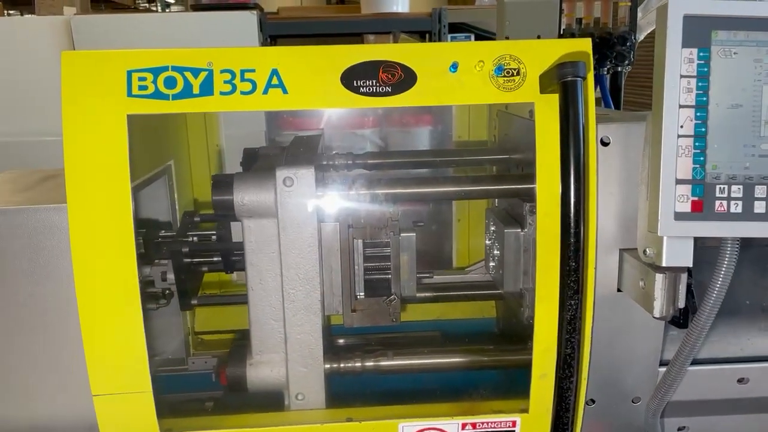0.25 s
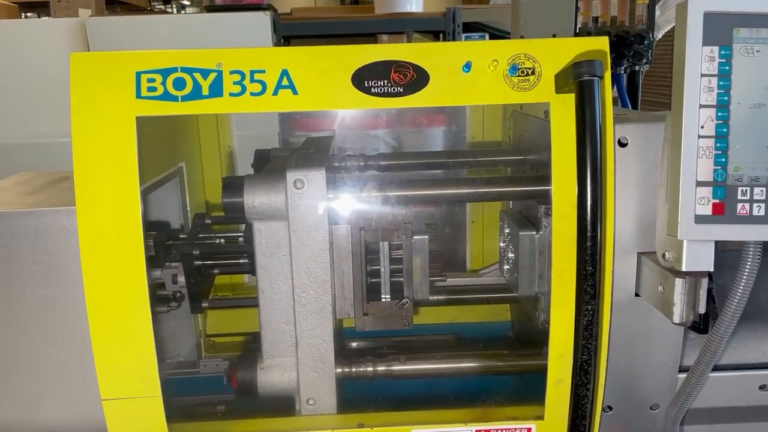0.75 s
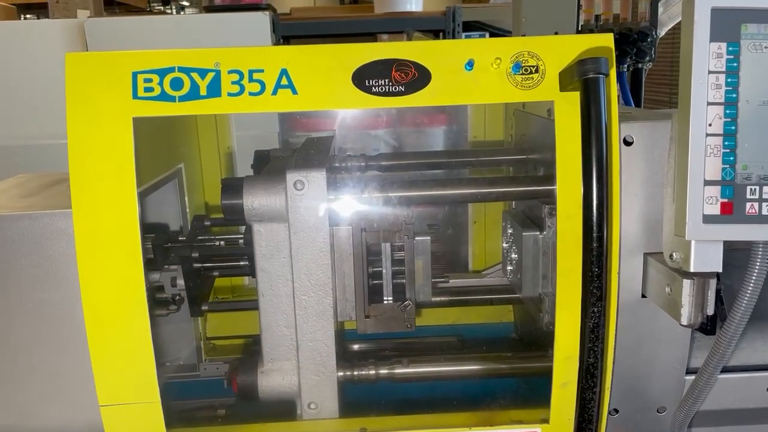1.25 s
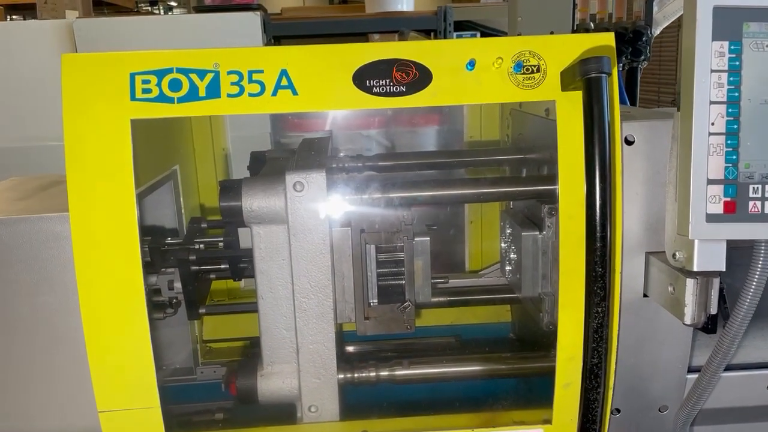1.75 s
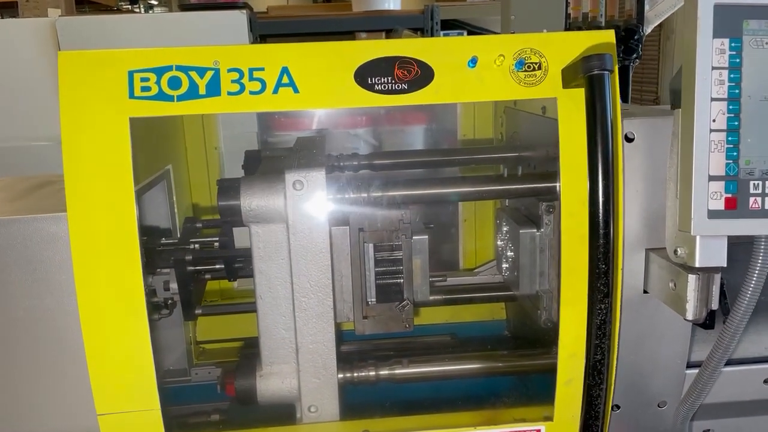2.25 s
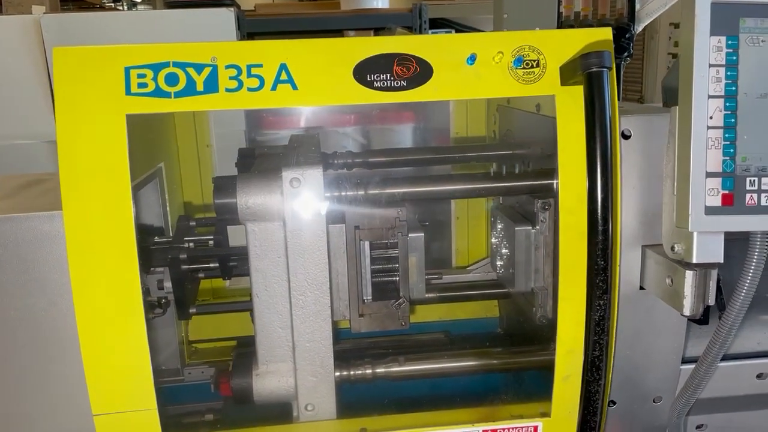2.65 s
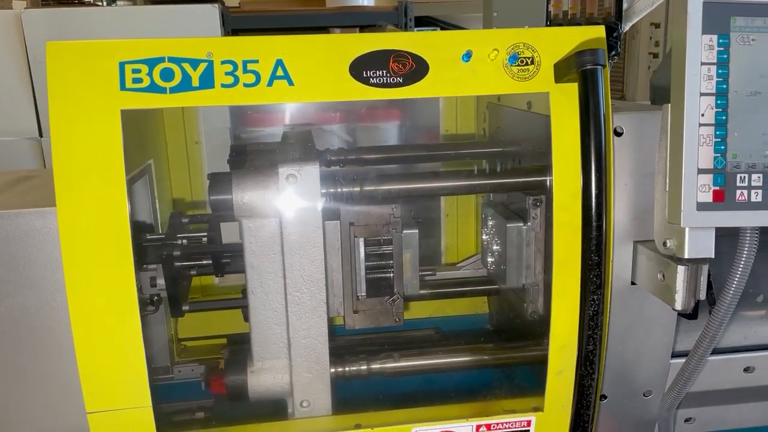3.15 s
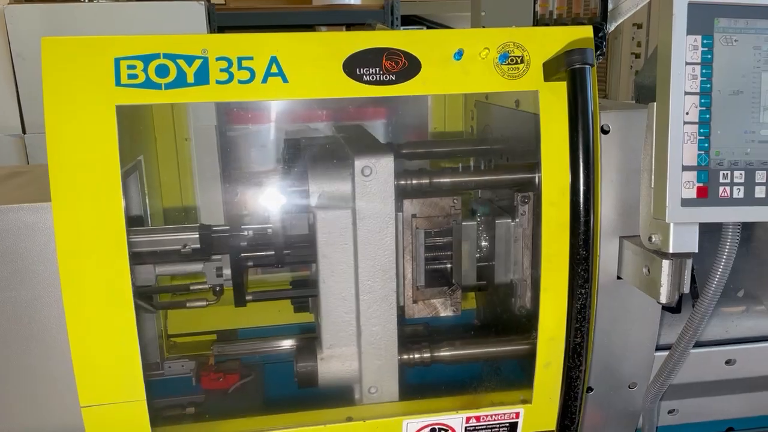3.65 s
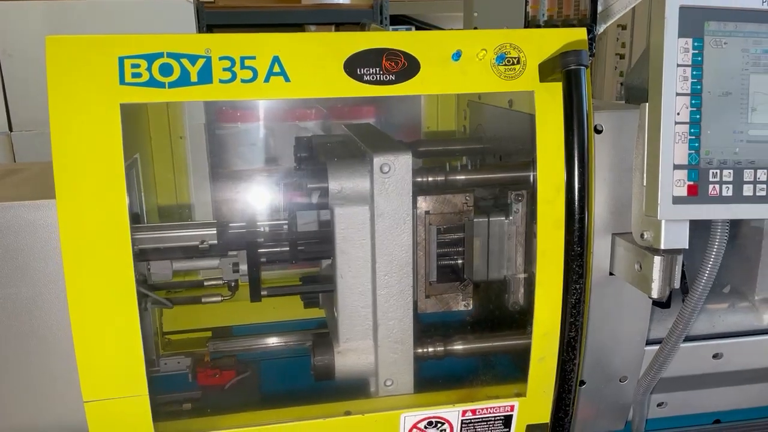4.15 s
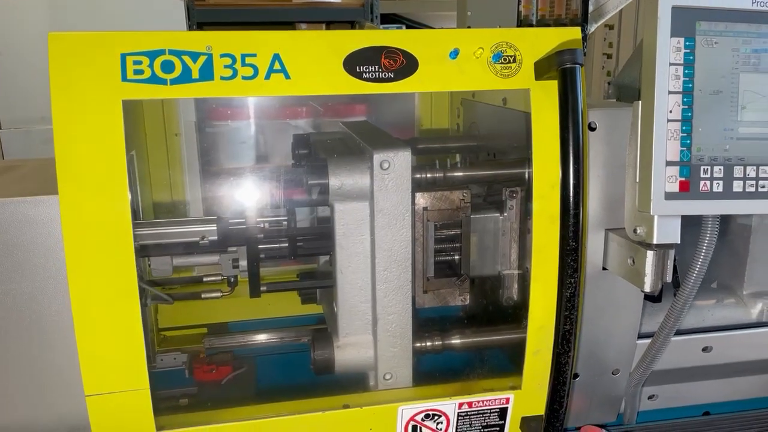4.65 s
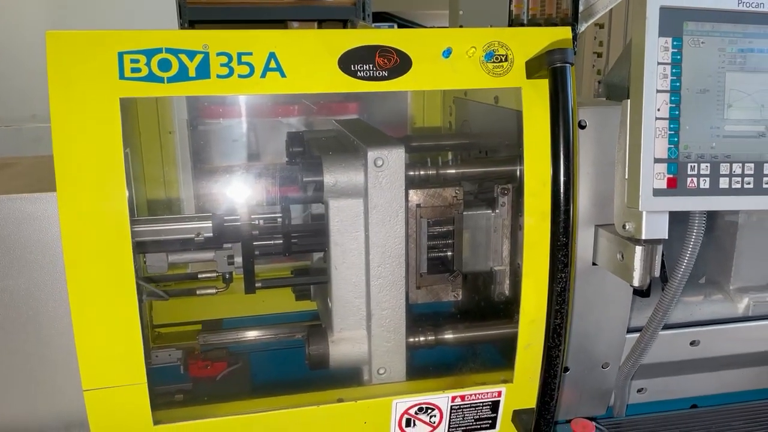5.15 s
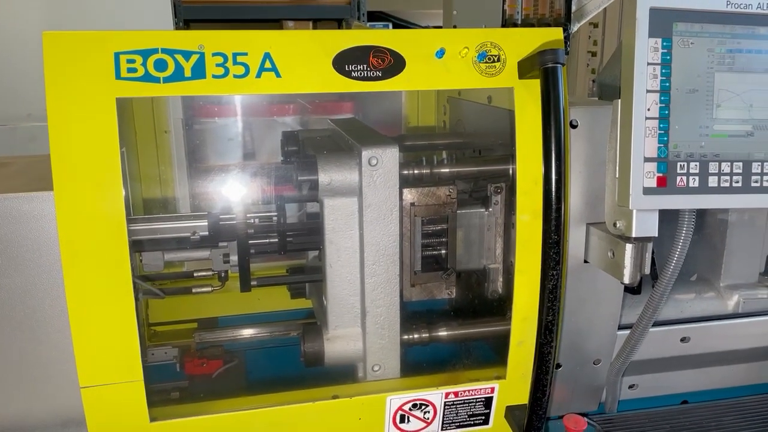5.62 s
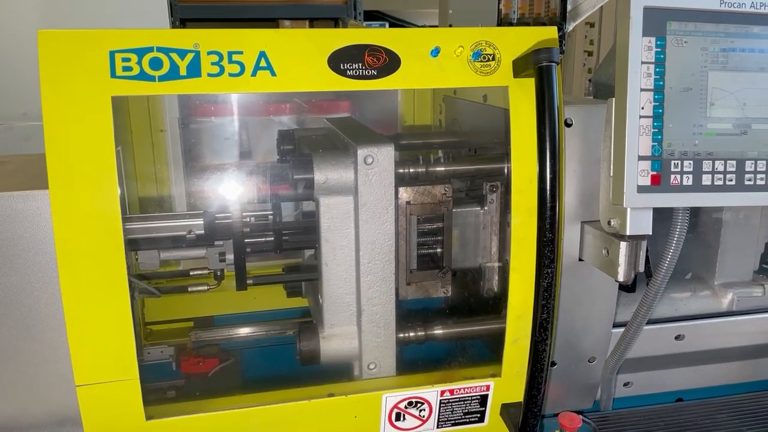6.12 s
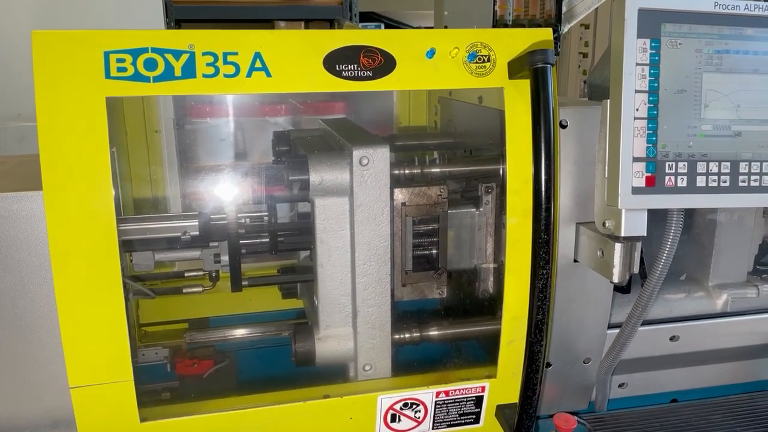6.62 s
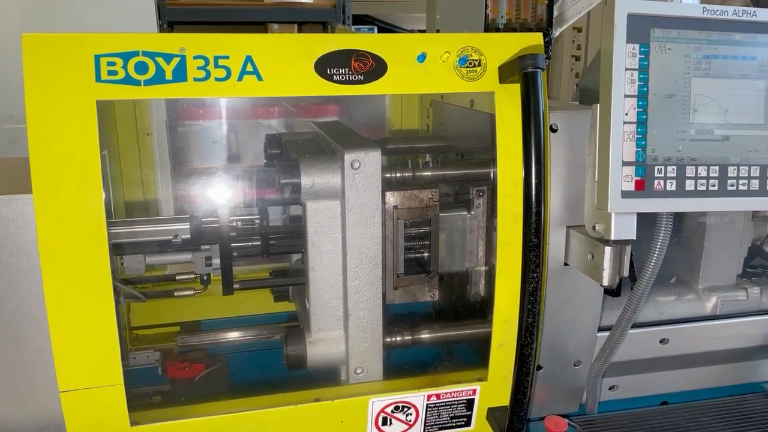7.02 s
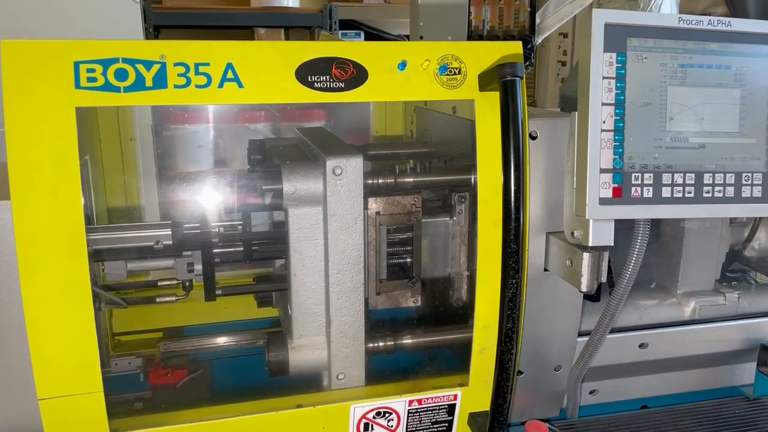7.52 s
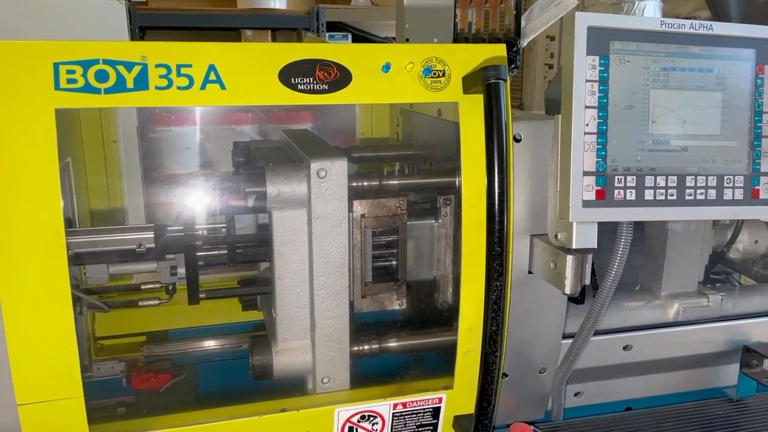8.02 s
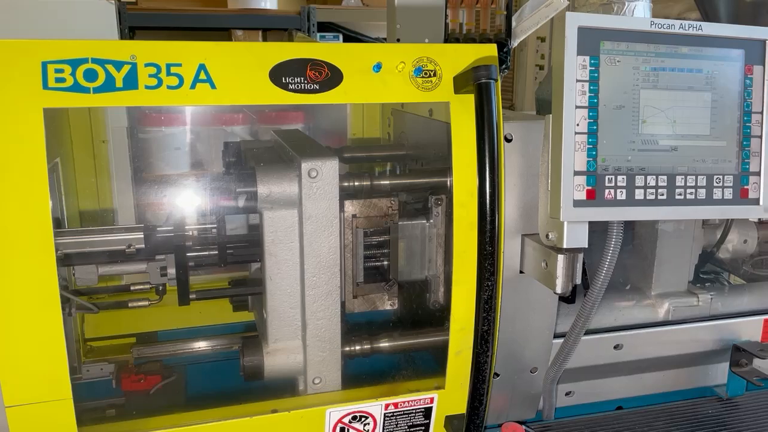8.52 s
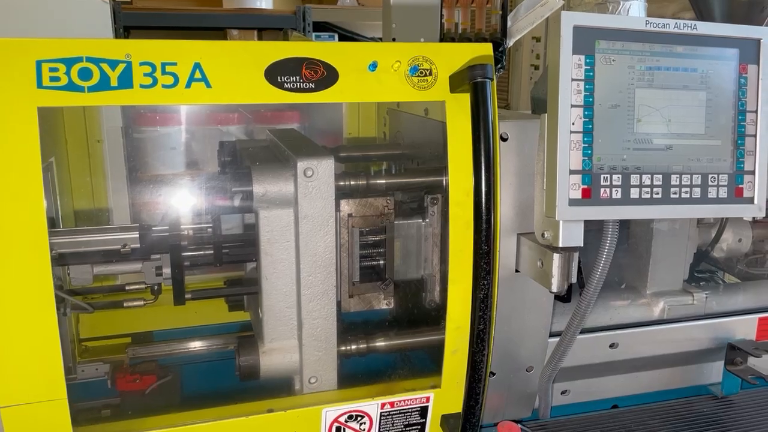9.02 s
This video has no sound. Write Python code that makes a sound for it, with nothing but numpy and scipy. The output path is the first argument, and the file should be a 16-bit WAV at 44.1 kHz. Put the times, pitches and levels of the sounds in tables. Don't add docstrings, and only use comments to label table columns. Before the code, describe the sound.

A hydraulic moulding machine runs in a workshop, heard close up in stereo, with low fan rumble, faint distant motors and a constant pump whine near 270 Hz and its multiples, strongest around 540. At 0.33 s oil spurts and whistles; dull knocks and a very sharp crack at 0.48 begin a plastic part's clatter down a chute, fading by 1.3. Valve clacks and knocks come at 1.32-1.4, then steady whine. At 2.94-3.0 valves snap, oil hisses and the pump surges and dips as the platen slides shut, easing by 3.85 after a soft puff. From 4.34 to 4.95 come hissing bursts, short whistles and clunks, sharpest near 4.7. A light valve tick at 5.1 and another at 5.49 lead into clamping: hiss and a loud, slightly lower hum from 5.9 to 6.9. A click at 6.88 releases it into steady idle whine and thin high hiss until about 9.2.

```python
import sys
import numpy as np
from scipy import signal
from scipy.fft import rfft, irfft
from scipy.io import wavfile
from scipy.ndimage import uniform_filter1d

SR = 44100
rng = np.random.default_rng(int(sys.argv[2]) if len(sys.argv) > 2 else 0)


def level_to_linear(level):
    exponent = np.asarray(level, float) / 20
    return 10 ** exponent


def wrap_up_sound(samples):
    columns = np.atleast_2d(samples).T
    tamed = np.clip(columns, -1, 1)
    steps = np.round(tamed * 32767).astype(np.int16)
    wavfile.write(sys.argv[1], SR, steps)


N = 408807
TIME_S = np.arange(N) / SR
BINS_HZ = np.fft.rfftfreq(N, 1 / SR)[1:]
BLOW_S = np.arange(SR // 2) / SR
CONTROL_STEP = 40

# freq_hz, density_db
HALL_SPECTRUM = [(150, 11.5), (300, -4), (450, -7), (700, -3), (1200, -6.5), (1500, -13.5), (2500, -15.5),
                 (3500, -29.5), (5000, -35), (7000, -28.5), (9000, -17.5), (11000, -42), (12500, -45),
                 (14500, -62.4)]
# freq_hz, density_db
RUMBLE_SPECTRUM = [(12, -49), (20, -67), (46, -5), (64, 3.5), (97, -6.5), (135, -6.5), (189, -27.5),
                   (220, -12), (290, -3.5), (480, -120)]
HALL_DB, RUMBLE_DB = -39, -31
# pitch_hz, level_db
MOTORS = [(360, -56.5), (716, -59), (915, -52), (1157, -58.5), (1206, -60), (1970, -62), (7065, -75)]

# time_s, rate_hz
PISTON_RATE = [(0, 269.1), (2.99, 269.3), (3.1, 266.5), (3.22, 264.0), (3.32, 265.7), (3.43, 267.5),
               (3.53, 269.2), (4.3, 269.15), (4.45, 266.3), (4.62, 268.6), (4.88, 267.2), (5.1, 269.2),
               (5.67, 269.0), (5.79, 267.3), (6.08, 266.2), (6.86, 266.3), (6.98, 269.3), (9.27, 269.3)]
IDLE_HZ, FULL_SLIP_HZ = 269.3, 3.1
CLAMP_HELD_S, CLAMP_RAMP_S = 5.45, 0.15
# multiple, open_idle_db, open_loaded_db, clamped_idle_db, clamped_loaded_db
ORDERS = [(2, -43, -29.5, -40.5, -27), (3, -51, -39, -52, -41), (4, -57, -51, -54, -38.5),
          (5, -70, -57, -60, -61), (6, -63, -56, -56, -55), (7, -70, -60, -68, -51),
          (8, -63, -56, -61, -64), (9, -61, -61, -55, -53), (10, -74, -61, -55.5, -52.5),
          (11, -73, -68, -68, -56), (12, -75, -64, -64, -66), (13, -71, -70, -66, -69),
          (14, -66, -67, -63, -61), (15, -78, -66, -76, -64), (17, -78, -70, -72, -74),
          (18, -78, -70, -78, -63), (20, -78, -64, -68, -63), (22, -72, -61, -74, -68),
          (24, -81, -69, -76, -68), (32, -90, -78, -89, -84), (35, -78, -66, -80, -69),
          (39, -75, -62, -80, -65), (42, -74, -60, -70, -60), (44, -78, -63, -80, -66)]
# time_s, gain_db
LINE_PRESSURE = [(.1, 1), (.3, 2.5), (1.24, -1), (1.6, 2.5), (3.0, -4), (3.17, 0), (3.26, -0.5), (3.34, 0),
                 (3.57, 5), (3.78, 6), (4.2, -1), (4.5, 1), (4.92, -3), (5.1, -1), (6.1, -1), (7.25, 0),
                 (9.1, 0), (9.22, -14)]
# start_s, stop_s, level_db
BASE_BOOM = [
    (.02, .14, -48),
    (3.05, 3.3, -44),
    (3.33, 3.5, -38),
    (3.6, 4.3, -56),
    (4.42, 4.76, -35),
    (4.85, 4.96, -46),
    (5.62, 5.82, -41),
    (5.82, 6.95, -34.5),
    (6.95, 9.4, -43.5),
]
# start_s, stop_s, level_db
TANK_HUM = [(-.05, .14, -42), (.3, .62, -47), (.62, 1.1, -42), (1.1, 1.5, -44), (1.5, 2.85, -40.5),
            (2.85, 3.0, -47), (3.0, 3.05, -36), (3.05, 3.12, -31), (3.13, 3.21, -25), (3.21, 3.32, -30.5),
            (3.32, 3.39, -26.5), (3.39, 3.47, -29.5), (3.55, 4.05, -40), (4.05, 4.35, -48),
            (4.35, 4.41, -35), (4.41, 4.49, -28.5), (4.53, 4.58, -30), (4.58, 4.65, -39), (4.66, 4.82, -45),
            (4.825, 4.94, -31), (4.94, 5.0, -40), (5.0, 5.2, -46), (5.2, 5.47, -41), (5.47, 5.64, -46),
            (5.64, 5.75, -39), (5.75, 5.8, -33), (5.8, 5.9, -30), (5.9, 5.97, -27.5), (5.97, 6.5, -24),
            (6.5, 6.9, -26), (6.9, 6.95, -31), (7.02, 7.8, -35.5), (7.8, 9.15, -39)]
# start_s, stop_s, level_db
PIPE_6 = [
    (1.5, 3, -59.5),
    (3.048, 3.4, -52),
    (3.545, 3.853, -54),
    (5.785, 6.06, -51),
    (6.2, 6.8, -58),
    (6.95, 8.398, -52),
    (8.4, 9.2, -56),
]
PIPE_7 = [
    (3.05, 3.4, -65),
    (3.6, 3.85, -57),
    (5.95, 6.25, -51.5),
    (6.25, 6.45, -58),
    (6.45, 6.66, -48.5),
    (6.95, 9.2, -60),
]
PIPE_9 = [
    (1.9, 3.4, -63),
    (6.1, 6.4, -58),
    (6.4, 6.92, -52),
    (6.95, 7.65, -67),
    (7.65, 8.75, -54.5),
    (8.75, 9.2, -59),
]
PIPE_10 = [
    (3.0, 3.45, -63),
    (5.904, 6.95, -55),
    (7.55, 8.35, -55),
    (8.35, 9.1, -62),
]
PIPE_16 = [(-.05, .33, -60.5), (0.324, .42, -46), (.44, .5, -57), (0.903, 3.03, -58), (3.51, 3.85, -57),
           (4.33, 4.46, -52), (4.46, 4.53, -56), (4.68, 4.73, -62), (4.87, 4.92, -55), (4.917, 4.98, -55),
           (5.1, 5.948, -67), (6.0, 6.93, -52.5), (6.955, 7.06, -47.5), (7.127, 7.4, -54),
           (7.4, 8.0, -58.5), (8.0, 9.4, -64)]
PIPE_19 = [(-.051, .041, -63), (.041, .171, -67), (1.326, 1.441, -54), (1.441, 1.601, -57),
           (2.941, 2.98, -54), (2.98, 3.035, -58), (3.035, 3.131, -47), (3.14, 3.2, -51), (3.2, 3.261, -55),
           (3.261, 3.31, -52), (3.31, 3.43, -56), (3.698, 3.851, -60), (4.341, 4.461, -56),
           (5.501, 5.951, -63), (6.01, 6.91, -66), (6.91, 7.081, -63), (7.101, 9.41, -66)]
SINGING_FADE_DB_PER_S, HUM_FADE_DB_PER_S = 105, 225
HUM_DB, HUM_SWELL_S = -3.2, 0.03

# freq_hz, density_db
OIL_SPECTRUM = [(250, 12.5), (400, 3.5), (700, 6), (1300, -7.5), (2000, -11), (3000, -13.5), (4500, -21),
                (6000, -20), (7500, -23.5), (8800, -21), (10000, -17), (11500, -18.5), (12700, -22.5),
                (14000, -31.5)]
# freq_hz, width_hz, level_db
PIPES = [(2205, 15, -2), (4230, 710, -17), (5040, 59, -27), (7000, 20, -30), (7820, 110, 3), (9420, 81, -2),
         (10000, 23, -34), (10800, 18, -2), (11200, 120, 14), (11840, 210, -5)]
# freq_hz, width_hz, level_db
FRAME = [(430, 165, 9)]
# open_s, shut_s, hiss_db, rush_db, shudder_db
STROKES = [
    (.34, .45, -44, -32, -36.5),
    (.443, .472, -38, -35, -27.5),
    (.45, .88, -51.5, -39, -51),
    (.47, .51, -36.5, -32.5, -46),
    (.79, .825, -61, -56, -36),
    (.88, 1.15, -62, -50, -44.5),
           (-.05, 0.04, -53, -45, -36), (1.309, 1.334, -46, -39, -50), (1.33, 1.353, -52, -45, -28),
               (1.362, 1.393, -50, -53, -40), (1.41, 1.54, -52.5, -49.5, -46),
               (2.942, 2.98, -40, -37, -35.5), (2.996, 3.187, -39, -41, -41), (3.186, 3.376, -44, -45, -41),
               (3.44, 3.855, -51.5, -50.5, -46), (3.84, 4.21, -60, -55, -42), (4.31, 4.36, -48, -39, -35),
               (4.354, 4.488, -39.5, -36, -40), (4.427, 4.464, -40, -55, -26.5),
               (4.51, 4.547, -42, -40, -28), (4.55, 4.68, -62, -44.5, -46), (4.684, 4.754, -45, -39, -29.5),
               (4.793, 4.987, -49, -46.5, -36.5), (5.487, 5.525, -46, -52, -36.5),
               (5.54, 5.95, -46.5, -55, -55), (5.953, 6.878, -44, -49, -52), (6.864, 6.954, -61, -43, -37),
               (6.9, 9.4, -53.5, -53, -55)]
# hiss_db, rush_db, shudder_db
LEAK_DB = [-62.5, -51, -46.5]
OPENING_S, DRAIN_DB_PER_S = 0.0085, 117

# start_s, peak_db, ring_hz, snap_db, crack_share
DROPS = [(0.333, -17.5, 2210, -4.5, 0.26), (0.449, -21, 4270, -11, 0.26), (0.4848, -6, 1700, -5, 0.76),
         (0.554, -14.5, 2000, -21, 0.58), (0.643, -23.5, 2490, -20, 0.27), (0.7312, -21.5, 1450, -9, 0.4),
         (0.793, -27, 1660, -7, 0.7), (0.816, -22.5, 1980, -7, 0.52), (0.861, -21, 1550, -4, 0.52),
         (0.8662, -21.5, 1910, -15, 0.24), (0.9406, -24, 1900, -12, 0.63), (0.9906, -27.5, 2000, -22, 0.17),
         (1.04, -29, 1220, -19, 0.43), (1.0877, -23, 1840, -31, .95), (1.1117, -35, 1940, -29, 0.4),
         (1.1321, -28, 1730, -16, 0.45), (1.242, -32, 1520, -25, 0.6)]
# freq_hz, width_hz, level_db
CHUTE_MODES = [(1550, 24, -19), (1840, 120, 31), (2420, 34, 20), (2630, 67, 6), (3240, 57, -1),
               (3760, 34, -33), (4370, 47, -33), (5750, 28, -16), (6070, 49, -25), (6900, 51, -28)]
RATTLE_T60_S, CRACK_SHORTENS_S = 0.19, 0.23
# start_s, stop_s, level_db, pitch_hz
WHISTLES = [(.3351, .391, -37, 2100), (.3361, .371, -34, 1500), (.3371, .361, -38, 1000),
            (.3381, .386, -38, 2400), (.3401, .411, -41, 2800), (.3411, .376, -47, 6900),
            (2.951, 3.041, -46, 1096), (3.061, 3.29, -57, 2126), (3.168, 3.331, -54, 1570),
            (3.171, 3.331, -58, 3170), (3.206, 3.331, -58, 2690), (4.323, 4.461, -50, 5220),
            (4.331, 4.405, -50, 2270), (4.353, 4.497, -44, 1588), (4.379, 4.461, -50, 3030),
            (4.531, 4.581, -52, 5980), (4.691, 4.771, -40, 587), (4.715, 4.765, -35, 750),
            (4.739, 4.831, -55, 2260), (4.916, 4.971, -56, 5900), (5.505, 6.921, -55, 11450),
            (6.919, 9.261, -55.5, 11280), (6.921, 9.261, -60.5, 10940)]
WHISTLE_T60_S, WHISTLE_FADE_S, SPURT_SHARE = 0.034, 0.012, 0.3
# start_s, peak_db, pitch_hz, t60_s
PINGS = [(.3371, -33, 6200, .04), (.4502, -27, 4350, .12), (.4503, -25, 3550, .04), (.4541, -17, 740, .076),
         (.4621, -22, 594, .06), (.4851, -8.5, 2820, .022), (.4855, -7.5, 1783, .028),
         (.4859, -22, 3700, .025), (.486, -25, 5150, .025), (.4862, -7.5, 1327, .021),
         (.4931, -9.5, 1430, .026), (.4949, -17, 1880, .025), (.5526, -22, 2800, .03),
         (.7331, -27, 1920, .05), (.8171, -26, 1600, .03), (.8596, -17, 1670, .025),
         (.8681, -20, 1854, .05), (.8771, -22, 1900, .028), (.8841, -26, 1790, .04),
         (1.0875, -24, 1850, .03), (1.3311, -36, 4300, .09), (1.3451, -27, 1493, .11),
         (1.3681, -35, 5090, .05), (2.9351, -42, 3500, .04), (2.9501, -36, 4310, .064),
         (2.9951, -36, 2550, .1), (2.9971, -37, 4330, .05), (2.9981, -40, 3150, .05),
         (4.6796, -17, 720, .03), (4.6821, -26, 5280, .04), (4.7001, -24, 780, .08),
         (4.7121, -30, 4700, .037), (4.7161, -30, 3030, .05), (4.7226, -18, 620, .02),
         (4.9351, -36, 3030, .05)]
# start_s, peak_db, pitch_hz, t60_s
KNOCKS = [(0.441, -20.5, 562, 0.11), (0.451, -16, 442, 0.086), (.459, -17.5, 393, 0.067),
          (0.484, -16, 401, 0.083), (0.791, -28, 522, 0.058), (.808, -25, 447, 0.077),
          (1.34, -17.5, 566, 0.046), (1.357, -23.5, 462, 0.078), (1.371, -21.5, 580, 0.082),
          (1.403, -22.5, 554, 0.046), (2.949, -34, 566, 0.11), (4.42, -28, 540, 0.099),
          (4.452, -29, 422, 0.06), (4.531, -28, 520, 0.078), (4.681, -31, 250, 0.091),
          (4.713, -23, 280, 0.044), (4.931, -38, 276, 0.083), (5.499, -44, 810, 0.11),
          (6.889, -30, 724, 0.06)]
PUSH_SHARE = 0.27
# start_s, peak_db, snap_db, t60_s
VALVES = [(1.3179, -21, -13, 0.16), (1.3396, -13, -3, 0.11), (1.3744, -25.5, 17, 0.037),
          (2.935, -19, -5, 0.17), (2.9522, -31, -10, 0.11), (2.997, -18.5, -16, 0.25),
          (3.786, -17, -25, 0.11), (4.337, -19.5, -11, 0.62), (4.5294, -18, 12.5, 0.08),
          (4.6767, -12, -4, 0.21), (4.712, -13, 0, 0.088), (4.928, -18, 2, 0.2), (5.1094, -24, -4, 0.077),
          (5.4894, -21.5, -7, 0.15), (6.8794, -25, 5, 0.088)]
SPOOL_HZ, SPOOL_T60_S, SPOOL_DB = 5230, 0.0092, -31

# freq_hz, likeness, left_lead_rad, left_minus_right_db
PORTS = [(60, .996, .12, -1), (160, 0.93, 0.3, -0.8), (300, 0.92, 0.15, 0.3), (420, .8, .15, 0),
         (513, 0.41, 0.2, -1.5), (950, 0.4, -0.5, .5), (1910, 0.35, -0.9, 1), (4280, .4, -.6, -4),
         (6300, 0.19, 1, -2.5), (7360, 1, 1.5, -.5), (8620, 0.87, 3.5, 2), (8960, .98, 3.5, -0.5),
         (10920, .995, 6.5, -1), (11200, .995, 7, 0), (12770, .97, 9, 0), (13300, .97, 10.5, 0),
         (14000, .9, 9.5, 0), (14700, .99, 14, -3)]


def rms_one(x):
    return x / np.sqrt(np.mean(x ** 2) + 1e-20)


def in_time(rows):
    time_s, *columns = np.transpose(rows)
    return [np.interp(TIME_S, time_s, column) for column in columns]


def drift(rate_hz):
    pole = np.exp(-2 * np.pi * rate_hz * CONTROL_STEP / SR)
    white = rng.standard_normal(N // CONTROL_STEP + 2002)
    slow = signal.lfilter([1], [1, -2 * pole, pole * pole], white)[2000:]
    return np.interp(np.arange(N) / CONTROL_STEP, np.arange(len(slow)), rms_one(slow))


def noise(spectrum, low_hz, high_hz, peaks=()):
    freq_hz, level_db = np.transpose(spectrum)
    gain = level_to_linear(np.interp(np.log(BINS_HZ), np.log(freq_hz), level_db))
    gain = gain / np.sqrt((1 + (low_hz / BINS_HZ) ** 6) * (1 + (BINS_HZ / high_hz) ** 6))
    for peak_hz, width_hz, peak_db in peaks:
        detune = 2 * (BINS_HZ - peak_hz) / width_hz
        gain = gain * (1 + 1.26 * level_to_linear(0.14 * peak_db) / (1 + detune ** 2))
    return rms_one(irfft(np.r_[0, gain] * rfft(rng.standard_normal(N)), N))


def patchy(x, low_hz, high_hz, patchy_db, rate_hz):
    edges_hz = np.geomspace(low_hz, high_hz, 17)
    out = np.zeros(len(x))
    for pair_hz in zip(edges_hz, edges_hz[1:]):
        band = signal.butter(2, pair_hz, "band", fs=SR, output="sos")
        out += level_to_linear(patchy_db * drift(rate_hz)) * signal.sosfilt(band, x)
    return rms_one(out)


def held(rows, fall_db_per_s, floor_db):
    t = np.arange(0, N + CONTROL_STEP, CONTROL_STEP) / SR
    power = level_to_linear(np.reshape(floor_db, (-1, 1))) ** 2
    for start_s, stop_s, *level_db in rows:
        rise = np.clip((t - start_s) / OPENING_S, 0, 1)
        shape = rise * level_to_linear(-fall_db_per_s * np.maximum(t - stop_s, 0))
        power = power + (level_to_linear(np.reshape(level_db, (-1, 1))) * shape) ** 2
    return [np.interp(TIME_S, t, 10 * np.log10(p)) for p in power]


def ring(x, pitch_hz, t60_s):
    r = level_to_linear(-60 / (t60_s * SR))
    w = 2 * np.pi * pitch_hz / SR
    return signal.lfilter([0, np.sin(w)], [1, -2 * r * np.cos(w), r * r], x)


def burst(t60_s, rise_s):
    return (1 - np.exp(-BLOW_S / rise_s)) * level_to_linear(-60 * BLOW_S / max(t60_s, 0.005))


def add(out, start_s, x):
    first = round(start_s * SR)
    out[first:first + len(x)] += x


def hall():
    tones = np.zeros(N)
    for pitch_hz, level_db in MOTORS:
        level = level_to_linear(level_db + 3 + 2.2 * drift(3))
        tones += level * np.sin(2 * np.pi * pitch_hz * TIME_S + 2.5 * drift(3))
    floor = level_to_linear(HALL_DB + 2.7 * drift(2.1)) * noise(HALL_SPECTRUM, 143, 16000)
    rumble = level_to_linear(RUMBLE_DB + 1.2 * drift(0.5)) * noise(RUMBLE_SPECTRUM, 15, 182)
    return rumble + floor + tones


def pump():
    rate_hz, = in_time(PISTON_RATE)
    pressure_db, = in_time(LINE_PRESSURE)
    phase = 2 * np.pi * np.cumsum(rate_hz + 0.08 * drift(6)) / SR
    load = np.clip((IDLE_HZ - rate_hz) / FULL_SLIP_HZ, 0, 1)
    clamp = np.clip((TIME_S - CLAMP_HELD_S) / CLAMP_RAMP_S, 0, 1)
    multiple, *states_db = np.transpose(ORDERS)
    levels_db = {}
    for k in range(2, 45):
        idle, moving, holding, pressing = [np.interp(k, multiple, db) for db in states_db]
        rest = idle + (holding - idle) * clamp
        loaded = moving + (pressing - moving) * clamp
        if k > 4:
            wander_db = 2.3 * drift(2.5)
        else:
            wander_db = 0.8 * drift(8) + 0.7 * (1 - load) * drift(2.5)
        levels_db[k] = rest + (loaded - rest) * load + pressure_db + wander_db
    for k, rows, rough_db in ((6, PIPE_6, 1.5), (7, PIPE_7, 1.5), (9, PIPE_9, 1.5),
                              (10, PIPE_10, 1.5), (16, PIPE_16, 1.8), (19, PIPE_19, 1.6)):
        levels_db[k] = held(rows, SINGING_FADE_DB_PER_S, floor_db=-70)[0] + rough_db * drift(34)
    hum_db = held(TANK_HUM, HUM_FADE_DB_PER_S, floor_db=-54)[0]
    hum_db = uniform_filter1d(hum_db, round(HUM_SWELL_S * SR))
    levels_db[2] = HUM_DB + hum_db + (2 - 1.2 * load) * drift(9)
    levels_db[1] = held(BASE_BOOM, SINGING_FADE_DB_PER_S, floor_db=-57.5)[0] + 0.2 * drift(1.5)
    whine = np.zeros(N)
    for k, level_db in levels_db.items():
        whine += level_to_linear(level_db) * np.sin(k * phase + rng.uniform(0, 2 * np.pi))
    return np.sqrt(2) * whine


def oil():
    hiss_db, rush_db, shudder_db = held(STROKES, DRAIN_DB_PER_S, LEAK_DB)
    hiss = level_to_linear(hiss_db + 3 + 1.2 * drift(25)) * noise(OIL_SPECTRUM, 6500, 13600, PIPES)
    eddies = patchy(noise(OIL_SPECTRUM, 1200, 6800, PIPES), 1000, 7500, patchy_db=0.8, rate_hz=10)
    rush = level_to_linear(rush_db + 0.1 + 1.2 * drift(20)) * eddies
    shudder = level_to_linear(shudder_db - 0.5 + 0.17 * drift(11)) * noise(OIL_SPECTRUM, 270, 1600, FRAME)
    return hiss + rush + shudder


def drops():
    out = np.zeros(N)
    bright = signal.butter(4, [7500, 12400], "band", fs=SR, output="sos")
    plastic = signal.butter(1, [1000, 3500], "band", fs=SR, output="sos")
    for start_s, peak_db, ring_hz, snap_db, crack in DROPS:
        grit = rng.standard_normal((2, SR // 2))
        soft = burst(RATTLE_T60_S - CRACK_SHORTENS_S * crack, rise_s=0.0046)
        hard = burst(0.02, rise_s=0.00014)
        shape = (1 - crack) * soft + crack * hard
        rattle = grit[0] * shape
        body = 1.6 * ring(rattle, ring_hz, 0.022) + 5 * signal.sosfilt(plastic, rattle)
        for mode_hz, _, mode_db in CHUTE_MODES:
            strength_db = rng.normal(0, 2.5)
            body += level_to_linear(0.5 * mode_db - 2 + strength_db) * ring(rattle, mode_hz, 0.0049)
        snap = signal.sosfilt(bright, grit[1] * shape)
        add(out, start_s, level_to_linear(peak_db) * (body / np.abs(body).max() + level_to_linear(snap_db + 11) * snap))
    return out


def whistles():
    out, white = np.zeros(N + SR), rng.standard_normal(N + SR)
    for start_s, stop_s, level_db, pitch_hz in WHISTLES:
        length_s = stop_s - start_s
        t = np.arange(round(length_s * SR) + SR // 4) / SR
        t60_s = min(WHISTLE_T60_S, SPURT_SHARE * length_s)
        turbulence = white[round(start_s * SR):][:len(t)]
        tone = rms_one(ring(ring(turbulence, pitch_hz, t60_s), pitch_hz, t60_s))
        fade = np.exp(-np.maximum(t - length_s, 0) / WHISTLE_FADE_S)
        add(out, start_s, level_to_linear(level_db) * tone * np.minimum(t / OPENING_S, 1) * fade)
    return out[:N]


def pings():
    out = np.zeros(N)
    for start_s, peak_db, pitch_hz, t60_s in PINGS:
        tone = np.sin(2 * np.pi * pitch_hz * BLOW_S)
        add(out, start_s, level_to_linear(peak_db) * burst(t60_s, rise_s=0.00062) * tone)
    return out


def knocks():
    out = np.zeros(N)
    for start_s, peak_db, pitch_hz, t60_s in KNOCKS:
        uneven = 1 + 0.65 * rng.standard_normal(SR // 2)
        push = uneven * burst(PUSH_SHARE * t60_s, rise_s=0.0025)
        push = push * np.sin(2 * np.pi * pitch_hz * BLOW_S)
        body = ring(push, pitch_hz, t60_s)
        body += 0.56 * ring(push, 2.3 * pitch_hz, 0.078)
        body += 0.52 * ring(push, 0.79 * pitch_hz, 0.027)
        add(out, start_s, level_to_linear(peak_db) * body / np.abs(body).max())
    return out


def valves():
    out = np.zeros(N)
    rush = noise(OIL_SPECTRUM, 670, 8400, PIPES)
    rush = rush + level_to_linear(SPOOL_DB) * ring(rush, SPOOL_HZ, SPOOL_T60_S)
    hiss = noise(OIL_SPECTRUM, 7800, 15000)
    for start_s, peak_db, snap_db, t60_s in VALVES:
        first = round(start_s * SR)
        part = slice(first, first + SR // 2)
        puff = rush[part] + level_to_linear(snap_db - 3) * hiss[part]
        add(out, start_s, level_to_linear(peak_db - 13) * burst(t60_s, rise_s=0.0021) * puff)
    return out


def room(x, t60_s=1.0, dull_hz=3500):
    t = np.arange(SR) / SR
    tail = rng.standard_normal(SR) * level_to_linear(-60 * t / t60_s) * (t > 0.012)
    tail = signal.sosfilt(signal.butter(1, dull_hz, fs=SR, output="sos"), tail)
    return signal.fftconvolve(x, tail / np.sqrt(np.sum(tail ** 2)))[:N]


def scene():
    blows = drops() + whistles() + pings() + knocks() + valves()
    rest = hall() + oil() + blows + level_to_linear(-16) * room(blows)
    whine = pump()
    edges_hz = np.arange(0, SR / 2 + 60, 60)
    delay_s = np.interp(BINS_HZ, edges_hz, rng.uniform(0.00111, 0.03, len(edges_hz)))
    scatter = np.exp(-2j * np.pi * np.cumsum(delay_s) * SR / N)
    scattered = irfft(rfft(rest) * np.r_[0, scatter] - 0.7j * rfft(whine), N)
    return np.array([rest + whine, scattered])


def roll_off(x):
    return signal.sosfilt(signal.butter(12, 16310, fs=SR, output="sos"), x)


def record(dry):
    freq_hz, *columns = np.transpose(PORTS)
    alike, lead_rad, tilt_db = [np.interp(np.r_[0, BINS_HZ], freq_hz, column) for column in columns]
    direct, scattered = rfft(dry)
    side = np.array([[1], [-1]])
    both = direct + side * np.sqrt((1 - alike) / (1 + alike)) * scattered
    ports = irfft(both * np.exp(0.5j * side * lead_rad) * level_to_linear(0.5 * side * tilt_db), N)
    ports = 1.1 * np.tanh(ports / 1.1)
    return roll_off(ports)


dry = scene()
out = record(dry)
wrap_up_sound(out)
```